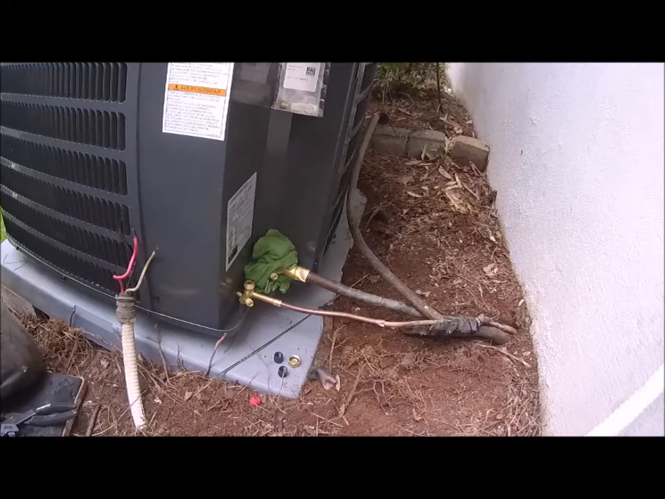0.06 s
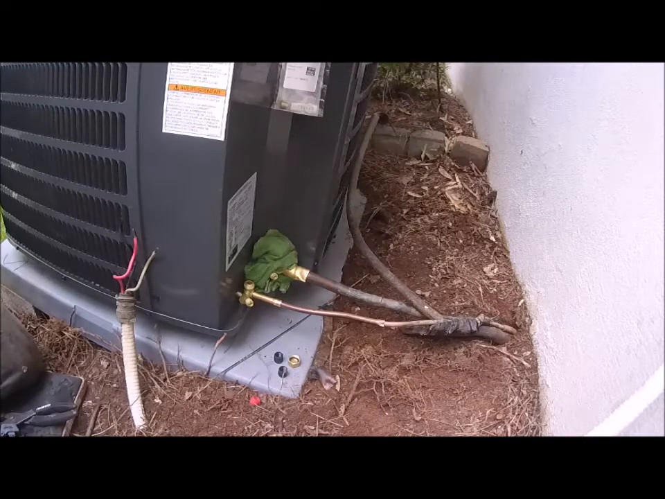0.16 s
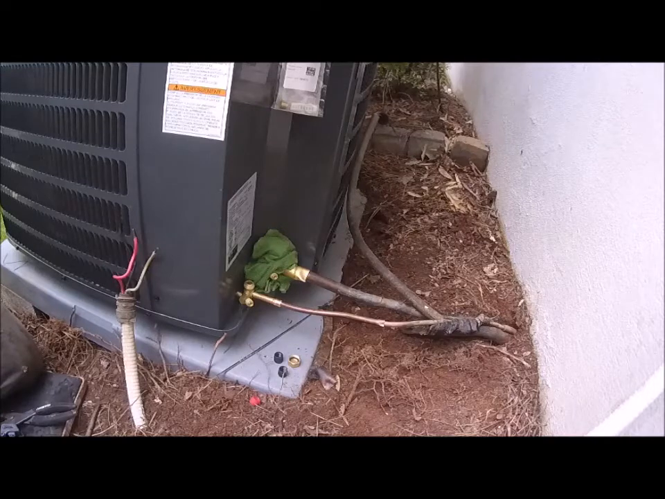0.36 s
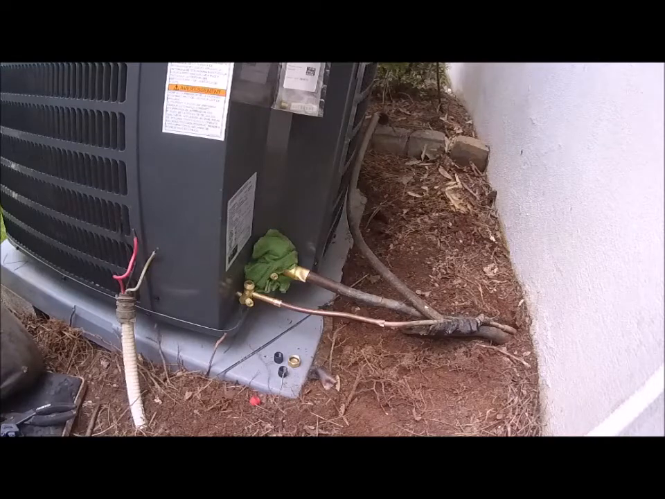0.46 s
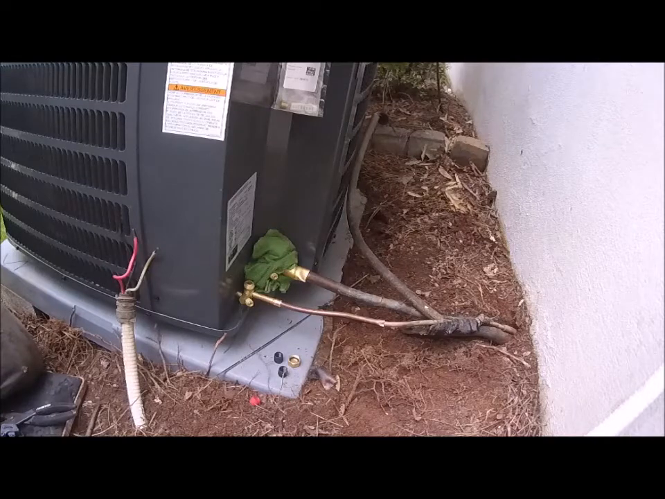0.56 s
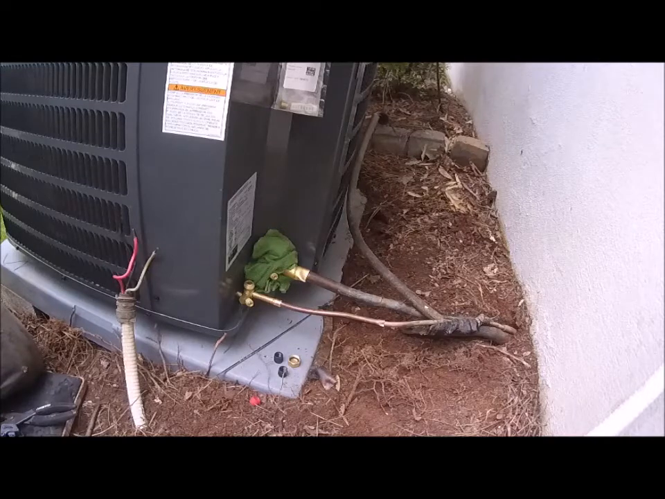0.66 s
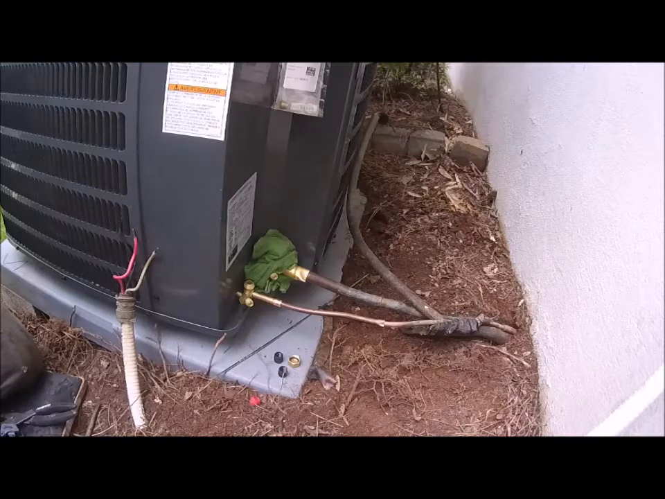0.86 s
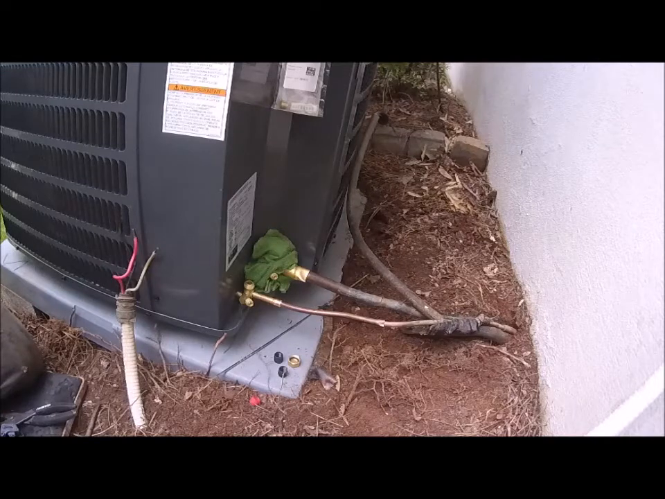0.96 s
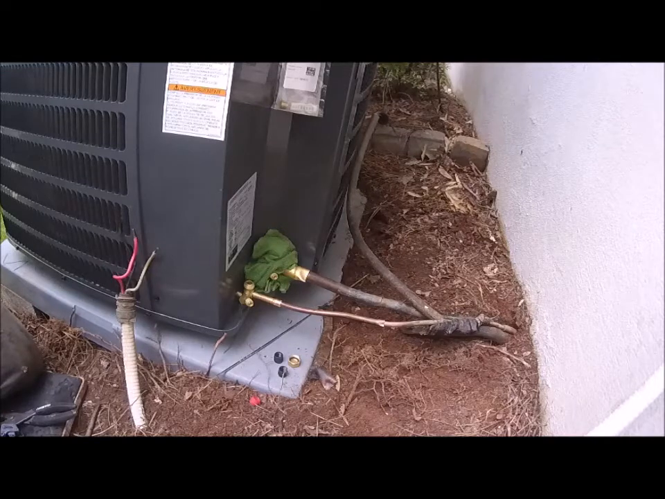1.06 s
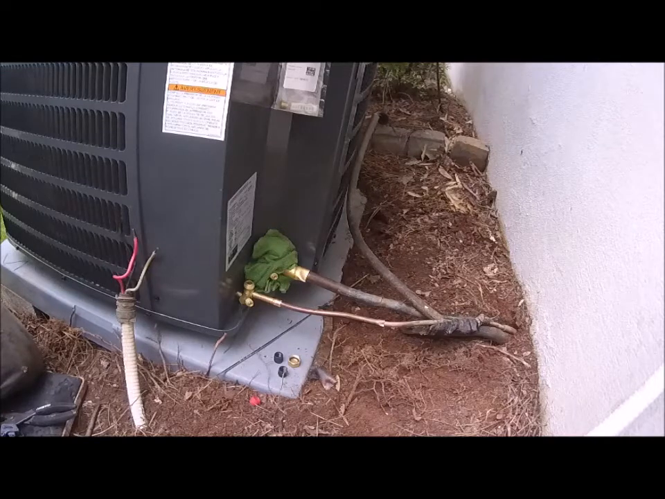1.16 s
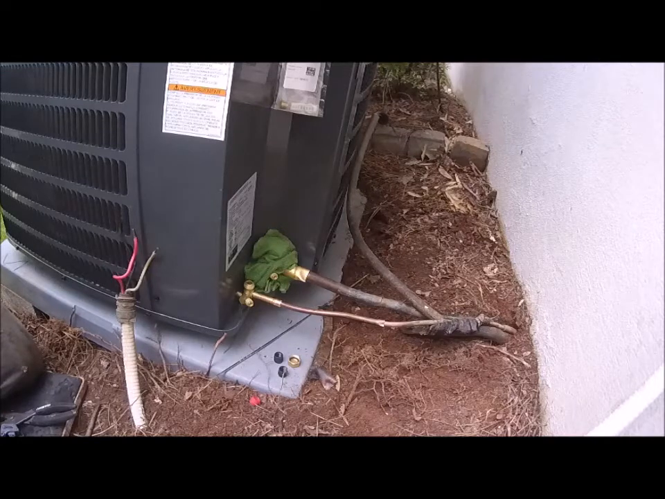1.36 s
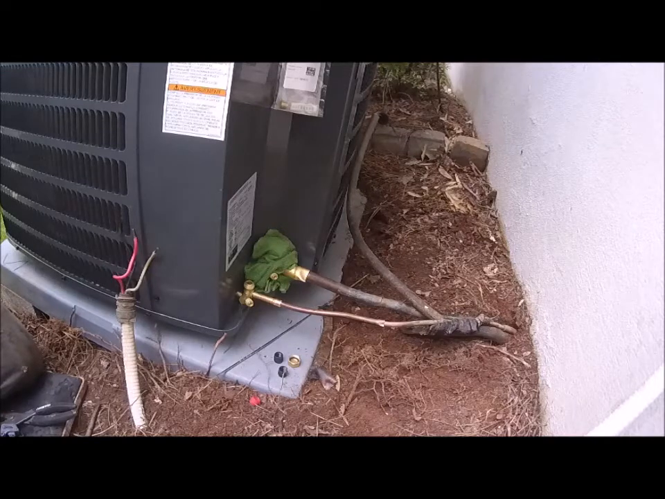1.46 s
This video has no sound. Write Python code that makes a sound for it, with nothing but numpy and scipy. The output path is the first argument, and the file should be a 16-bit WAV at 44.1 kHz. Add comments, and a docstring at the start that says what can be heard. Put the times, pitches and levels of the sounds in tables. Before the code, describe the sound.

A hand torch igniter clicks close by outdoors over a faint, steady gas hiss. Sharp, bright spring snaps come at about 0.21, 0.57 and 0.85 seconds, the last two loudest, with tiny rebounds. Lighter scraping return clicks follow near 0.39, 0.74 and 1.0. At 1.23 a knock briefly rings the metal tube. Short bright echo from the wall; small microphone, clipped peaks.

```python
"""The igniter of a hand torch, outdoors beside a wall: its trigger is squeezed and let go three times.
The catch slips, the spring hammer snaps and rebounds, and the parts scrape back; then the torch is knocked once.
Each contact is gritty noise, heard as a crack and through ringing parts; the knock also rings the tube.
A short noise tail makes the echo, and shaped noise makes the steady gas hiss from the tip.
The small microphone has a notch in the treble and clips the loudest snaps."""
import sys
import numpy as np
from scipy import signal
from scipy.fft import rfft, irfft
from scipy.io import wavfile
from scipy.ndimage import uniform_filter1d

SR = 44100
rng = np.random.default_rng(int(sys.argv[2]) if len(sys.argv) > 2 else 0)


def ratio_of_db(decibels):
    """Turn decibels (scalar or array-like) into linear amplitude factors; 0 dB maps to 1."""
    return 10 ** (np.asarray(decibels, float) / 20)


def waveform_to_disk(signal):
    """Save audio, clipped to [-1, 1], as 16-bit WAV at the path in sys.argv[1]."""
    frames = np.transpose(np.atleast_2d(signal))
    scaled = np.clip(frames, -1, 1) * 32767
    samples = np.round(scaled).astype(np.int16)
    wavfile.write(sys.argv[1], SR, samples)


N = 66150  # length of the scene [samples]
SPAN = 8192  # length of one contact [samples]
PRE = 512  # room before its peak or start [samples]

# Parts sliding over each other: (time of the peak [s], relative level [dB], rise time constant [ms],
# time to fall 60 dB [ms], tilt [dB per octave], spring ring [dB], handle ring [dB])
SLIDE_EVENTS = [(0.2096, -9, 0.89, 27, 2.5, 4.5, -10.5), (0.371, -37, 1.5, 53, -2.5, -6, -25),
                (.3850, -20, 2, 20, -0.5, 12, -26), (.5664, -10.5, 0.47, 36, 0, -15, -6),
                (0.7313, -19.5, 2.6, 38, -0.5, 8, -38), (0.8446, -11, 1.24, 22, -0.5, 3.5, -17.5),
                (0.9814, -33.5, 1.5, 30, 1.5, 11, -28), (1.0015, -13.5, 1.5, 25, 5, 6, -36),
                (1.2370, -24, 2.5, 88, 1, -14, -12)]
# Hammer and stops striking: (time [s], relative level [dB], time to fall 60 dB [ms],
# tilt [dB per octave], spring ring [dB], handle ring [dB])
SNAP_EVENTS = [(0.2135, -0.5, 29.3, 4, 5, -36), (.2265, -14.5, 13, -3, -10, -8.5),
               (0.387, -10, 26.7, 3, -1, -27), (0.572, 0, 29.3, 8, 6.5, -34),
               (0.5834, -20, 50, -1.5, -9, -14), (.7484, -15, 24, 4, -28, -34),
               (0.8501, -2.5, 36, 9, 2, -28), (0.862, -15, 29, -0.5, 2, -18),
               (1.0022, -7, 28.3, 20, 6, -44), (1.2286, -6.5, 21.2, 3.5, 7.5, -6)]
# Dull push of the hammer into the handle: (time of the start [s], level [dB])
THUMP_EVENTS = [(0.5726, -35), (0.8504, -29)]

# Ringing of the igniter body: (frequency [Hz], relative level [dB], time to fall 60 dB [s])
BODY_MODES = [(3250, -8, .008), (3700, -6, .007), (4350, -6, .007), (4900, -9, .007), (8900, -5, .006),
              (9500, -4, .006), (10300, -6, .006), (11300, -3, .006), (11900, -2, .006), (12600, -7, .005),
              (13700, -5, .005)]
# Ringing of the hammer spring: (frequency [Hz], relative level [dB], time to fall 60 dB [s])
SPRING_MODES = [(5850, -5, .010), (6170, 0, .016), (6340, -1, .016), (6750, -8, .008)]
# Ringing of the handle shell: (frequency [Hz], relative level [dB], time to fall 60 dB [s])
HANDLE_MODES = [(2030, 0, .012), (2550, -7, .007), (4500, 0, .006)]
# Ringing of the torch tube after the knock: (frequency [Hz], level [dB], time to fall 60 dB [s])
TUBE_MODES = [(622, -22.5, 0.062), (549, -30, 0.065), (890, -24, .02), (1084, -28, 0.18), (1940, -31, 0.16),
              (2700, -17.5, 0.056), (11600, -30, 0.083), (11870, -36, .05)]

# Broad crack of the contact: (frequency [Hz], relative level [dB])
CRACK_COLOUR = [(300, -21.5), (1000, -16), (1600, -21), (2300, -42), (3300, 4.5), (5300, -13), (6300, 3.5),
                (7500, -2.5), (9000, 0), (12000, -6.5), (14500, -1), (16100, -33)]
# Gas hiss with the outdoor background: (frequency [Hz], relative level [dB])
HISS_COLOUR = [(15, -57), (25, -25), (145, -13), (302, -21.5), (345, -11), (453, -16.5), (562, -7),
               (610, -12), (1020, -7.5), (1300, -11), (2850, -7), (3090, -4), (6080, -1.5), (7980, -7),
               (10500, -10.5), (14500, -17.5), (16100, -26)]
# Bass cut of the ringing parts and the echo: (frequency [Hz], gain [dB])
BASS_CUT = [(100, -50), (1000, -24), (1900, 0), (16000, 0)]


def unit(x):
    """Scale to an average (rms) level of 1."""
    return x / np.sqrt(np.mean(x ** 2))


def fade(t, t60):
    """Decay that starts at t = 0 and falls 60 dB in t60 seconds."""
    return (t >= 0) * np.exp(-np.log(1000) * np.maximum(t, 0) / t60)


def colour(x, table, tilt_db=0):
    """Shape the spectrum by a table, and tilt it about 5 kHz [dB per octave]."""
    hz = np.maximum(np.arange(len(x) // 2 + 1) * SR / len(x), 10)
    table_hz, table_db = np.array(table).T
    shape_db = np.interp(np.log(hz), np.log(table_hz), table_db)
    octaves = np.log2(np.clip(hz, 1000, 16000) / 5000)
    return irfft(rfft(x) * ratio_of_db(shape_db + tilt_db * octaves), len(x))


def hiss():
    """Gas at the tip over the outdoor background: shaped noise whose level wavers slightly."""
    hiss_db, waver_db = -39.5, 0.6  # waver: spread before smoothing
    hold = int(SR / 15)  # samples between new random levels
    steps = np.repeat(rng.standard_normal(N // hold + 1), hold)
    waver = uniform_filter1d(uniform_filter1d(steps, hold), hold)[:N]
    noise = unit(colour(rng.standard_normal(N), HISS_COLOUR))
    return ratio_of_db(hiss_db + waver_db * waver) * noise


def wall(x):
    """Short, bright, diffuse echo from the wall, the metal cabinet and the ground: a fading noise tail."""
    echo_db, t60_s, tilt_db, delay_s = -15.5, 0.14, 3, 0.003
    t = np.arange(SPAN) / SR
    tail = colour(rng.standard_normal(SPAN), BASS_CUT, tilt_db) * fade(t - delay_s, t60_s)
    tail = tail / np.sqrt(np.sum(tail ** 2))
    return ratio_of_db(echo_db) * signal.fftconvolve(x, tail)[:N]


def ring(modes):
    """Response of a part to one tap: a sum of fading sines, one for each way it can vibrate (mode)."""
    t = np.arange(SPAN) / SR
    return sum(ratio_of_db(db) * fade(t, t60) * np.sin(2 * np.pi * hz * t) for hz, db, t60 in modes)


def ring_through(grit, modes, tilt_db=0):
    """Contact noise shaking a part; each contact lands elsewhere, so pitches and levels shift a little."""
    pitch_spread, level_spread_db = 0.008, 3  # pitch spread as a fraction
    shifts = rng.standard_normal((len(modes), 2))
    moved = [(hz * (1 + pitch_spread * a), db + level_spread_db * b, t60)
             for (hz, db, t60), (a, b) in zip(modes, shifts)]
    rung = signal.fftconvolve(grit, ring(moved))[:SPAN]
    return unit(colour(rung, BASS_CUT, tilt_db))


def contact(shape, tilt_db, spring_db, handle_db):
    """Gritty noise of the given envelope: heard as a crack and through body, spring and handle."""
    crack_db, body_db, grit_db = -1.5, -0.5, 2.5  # grit: average random boost of each sample
    roughness = ratio_of_db(grit_db * rng.exponential(size=SPAN))
    grit = rng.standard_normal(SPAN) * roughness * shape
    crack = ratio_of_db(crack_db) * unit(colour(grit, CRACK_COLOUR, tilt_db))
    body = ratio_of_db(body_db) * ring_through(grit, BODY_MODES, tilt_db)
    spring = ratio_of_db(spring_db) * ring_through(grit, SPRING_MODES) / 2
    handle = ratio_of_db(handle_db) * ring_through(grit, HANDLE_MODES)
    return (crack + body + spring + handle) * np.sqrt(np.mean(shape ** 2))


def add(out, s, x):
    """Mix x in so that its sample PRE falls at time s."""
    start = int(round(s * SR)) - PRE
    out[start:start + len(x)] += x[:len(out) - start]


def slides(out, t):
    """Sliding parts: friction noise that swells to a peak, then fades."""
    for s, db, rise_ms, t60_ms, *tone in SLIDE_EVENTS:
        swell = np.exp(np.minimum(t, 0) / (rise_ms / 1000))
        shape = swell * fade(np.maximum(t, 0), t60_ms / 1000)
        add(out, s, ratio_of_db(db) * contact(shape, *tone))


def snaps(out, t):
    """Striking hammer and stops: noise that starts at once and fades."""
    for s, db, t60_ms, *tone in SNAP_EVENTS:
        add(out, s, ratio_of_db(db) * contact(fade(t, t60_ms / 1000), *tone))


def thumps(out, t):
    """Hammer pushing into the handle: one smooth, one-sided pulse each."""
    thump_ms = 2.25
    for s, db in THUMP_EVENTS:
        add(out, s, ratio_of_db(db) * np.sin(np.pi * np.clip(t * 1000 / thump_ms, 0, 1)) ** 2)


def tube_knock(out):
    """Torch tube rung by the knock, with the bass below 420 Hz cut."""
    knock_s = 1.2287
    highpass = signal.butter(4, 420, "high", fs=SR, output="sos")
    tube = signal.sosfilt(highpass, ring(TUBE_MODES))
    add(out, knock_s, np.pad(tube, (PRE, 0)))


def igniter():
    """Trigger and hammer moving: slides, snaps and thumps, and the tube ringing from the knock."""
    out = np.zeros(N)
    t = (np.arange(SPAN) - PRE) / SR  # 0 at the peak or start of a contact
    slides(out, t)
    snaps(out, t)
    thumps(out, t)
    tube_knock(out)
    return out


def scene():
    """Igniter, its echo and the hiss, as one channel."""
    clicks = igniter()
    return (clicks + wall(clicks) + hiss())[None]


def band_limit(x):
    """A steep low-pass at the top of the band."""
    return signal.sosfilt(signal.butter(12, 16270, fs=SR, output="sos"), x)


def record(dry):
    """Small microphone with a treble notch and clipping; after it, a steep top cut, then clipping again."""
    notch_hz, notch_width_hz, notch_db = 7930, 200, -15
    top_hz, clip = 14900, 1.0  # clip: full scale
    hz = np.arange(N // 2 + 1) * SR / N
    notch = ratio_of_db(notch_db * np.exp(-((hz - notch_hz) / notch_width_hz) ** 4))
    mic = irfft(rfft(dry) * notch, N)
    clipped_mic = np.clip(mic, -clip, clip)
    top_cut = signal.cheby1(8, 0.3, top_hz, fs=SR, output="sos")
    without_top = signal.sosfilt(top_cut, clipped_mic)
    return band_limit(np.clip(without_top, -clip, clip))


dry = scene()
out = record(dry)
waveform_to_disk(out)
```